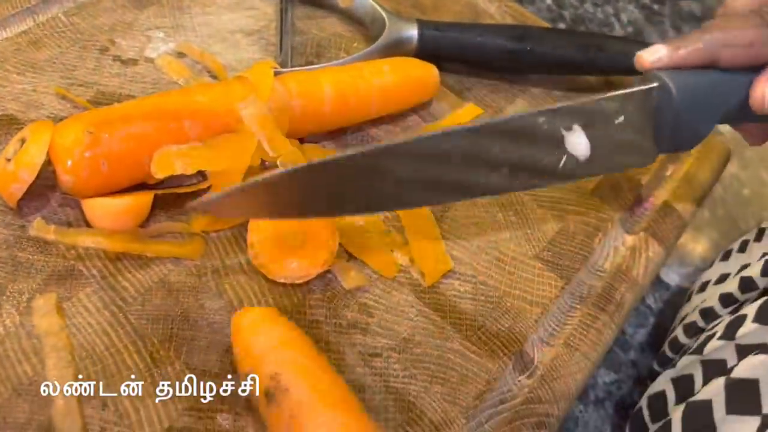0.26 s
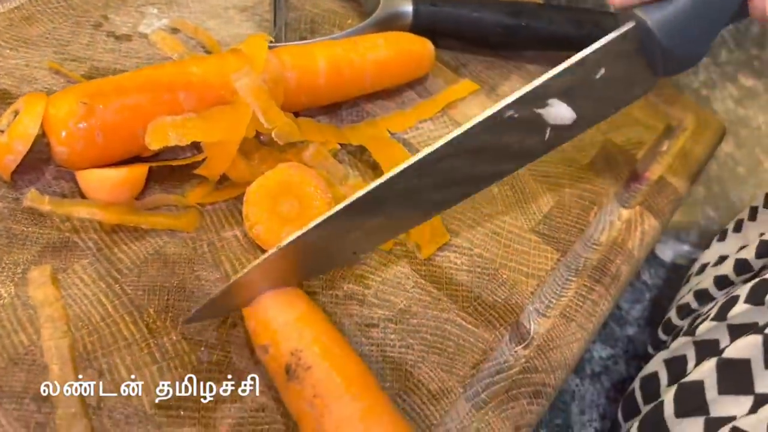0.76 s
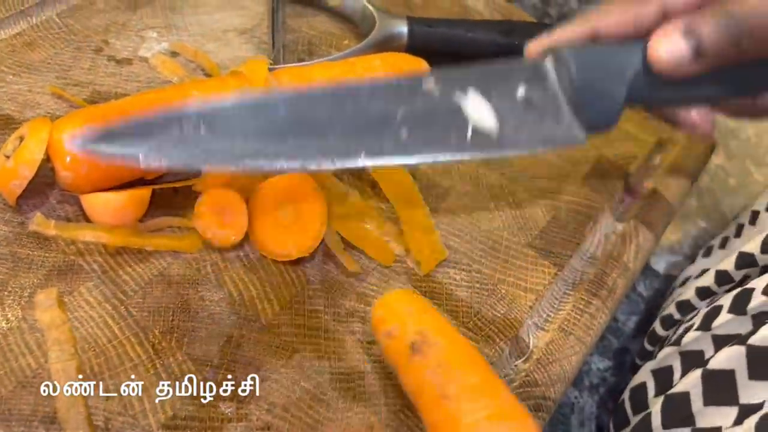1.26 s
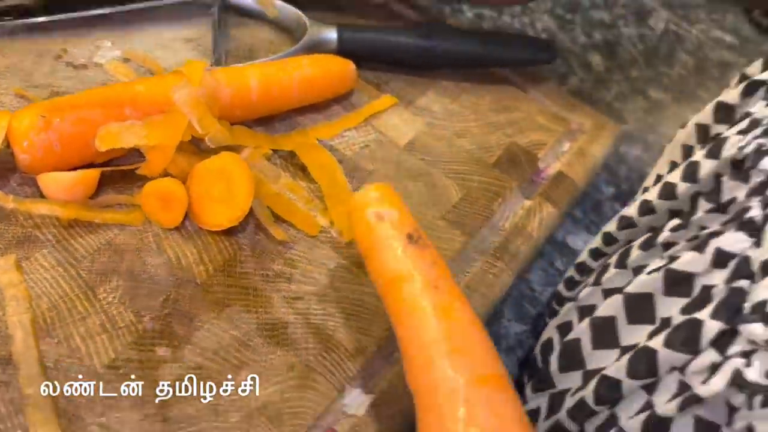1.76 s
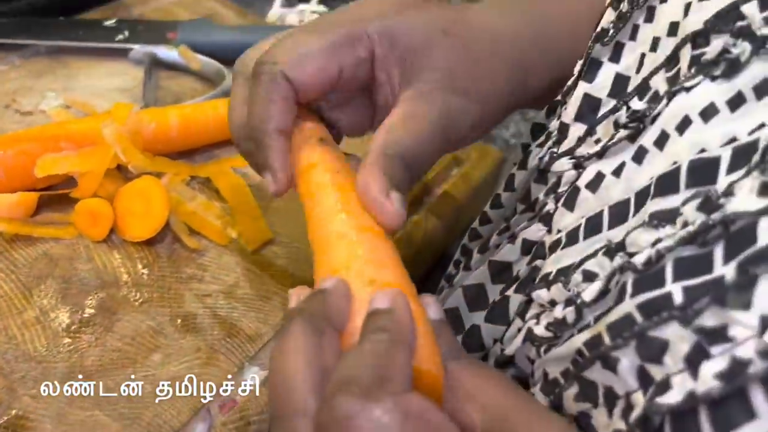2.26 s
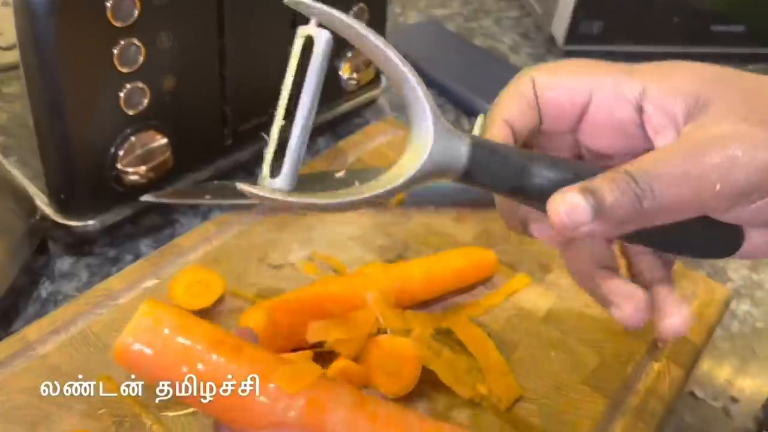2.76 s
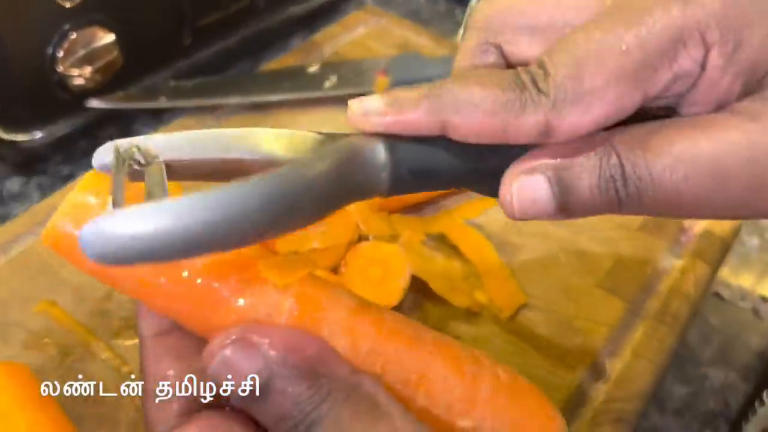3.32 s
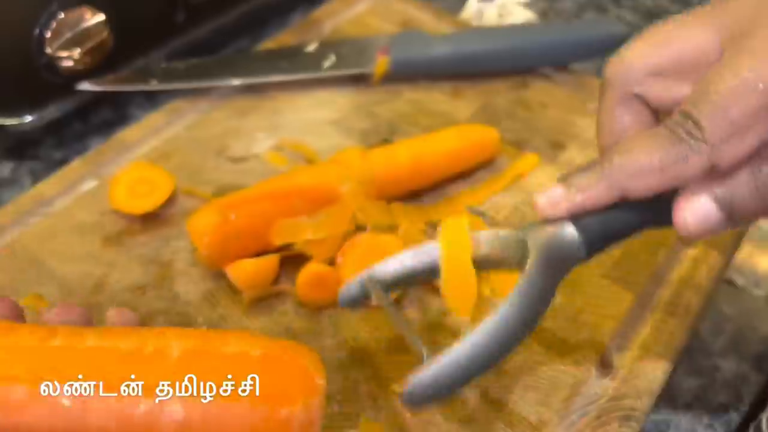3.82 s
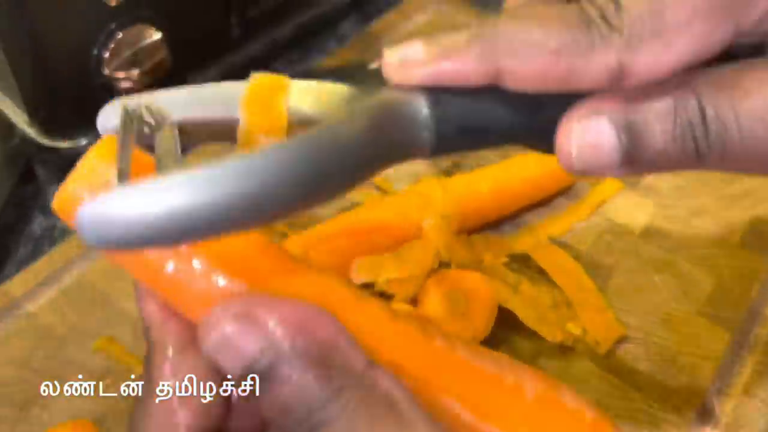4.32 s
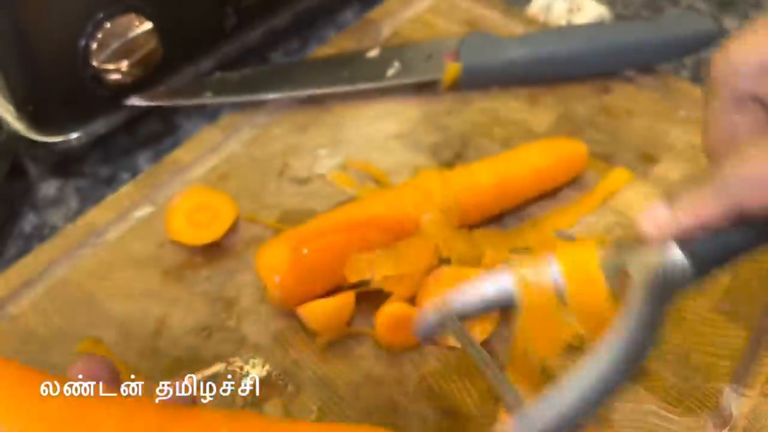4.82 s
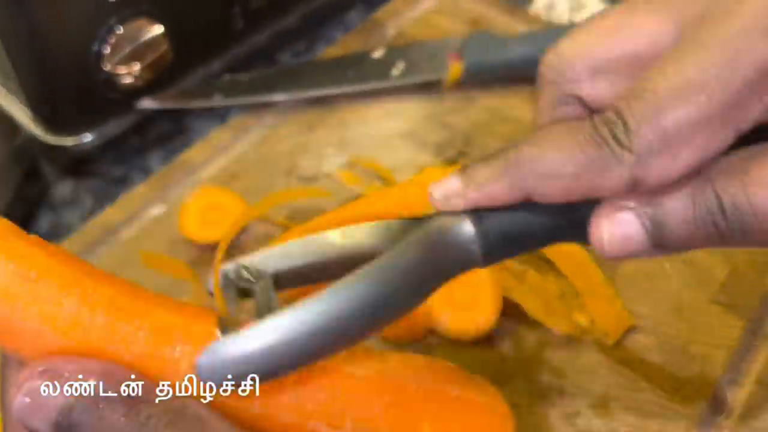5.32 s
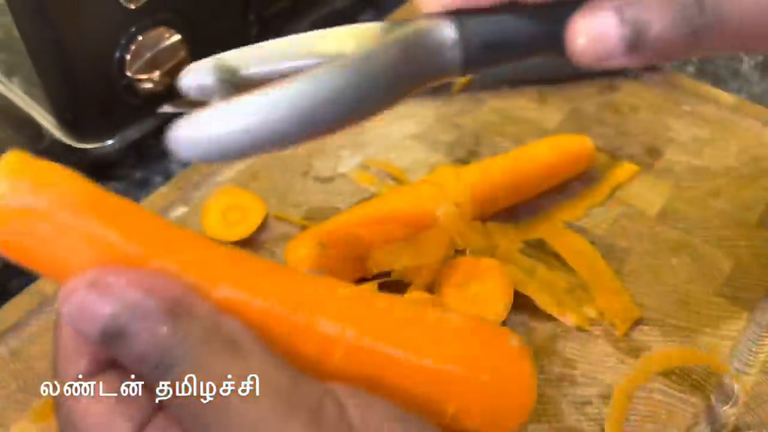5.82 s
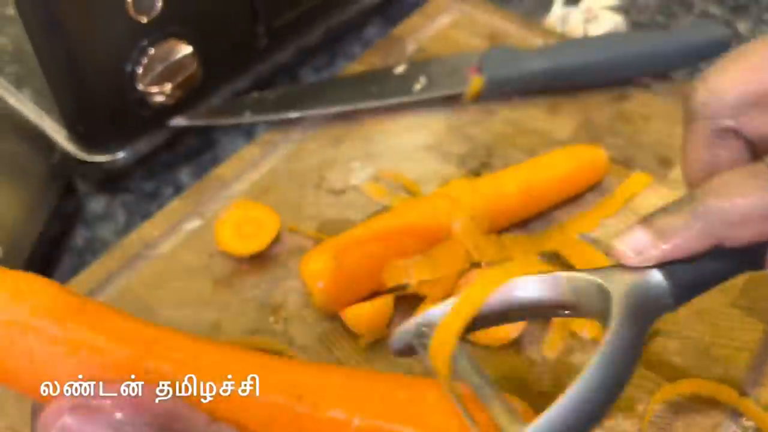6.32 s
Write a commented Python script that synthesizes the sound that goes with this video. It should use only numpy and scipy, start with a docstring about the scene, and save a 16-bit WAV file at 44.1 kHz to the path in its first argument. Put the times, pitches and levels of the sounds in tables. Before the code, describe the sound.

Soft handling thuds lead to a crunchy carrot cut, its squeak ending in a hard snap and board knock. Several sharp wooden blows follow as the knife is set down, some distorting. Then a small metal peeler chatters in the hand and pulls four half-second, bright, hissy scrapes along the carrot, clicking back after each. Dry, close sound, short room echoes and low hum.

```python
"""Carrot trimmed and peeled in a small kitchen

A knife cuts the end off a carrot on a wooden board and is laid down; then a swivel peeler rattles in
the hand and takes four long strips. Blows and clicks are rough contacts ringing modes; cutting and
peeling are dense random grains through fixed and gliding resonances. A soft hum and rustle lie beneath;
short noise echoes answer, and the hardest blows overload the close microphone."""
import sys
import numpy as np
from scipy import signal
from scipy.fft import rfft, irfft
from scipy.io import wavfile

SR = 44100
rng = np.random.default_rng(int(sys.argv[2]) if len(sys.argv) > 2 else 0)


def to_wav(s):
    """Save 16-bit WAV."""
    ch = np.atleast_2d(s).T  # columns
    pcm = np.round(np.clip(ch, -1, 1) * 32767)  # PCM
    wavfile.write(sys.argv[1], SR, pcm.astype(np.int16))


N = 290178

# blows on the board: (time [s], peak [dB], centre of colour [Hz], contact [ms], freedom to ring [0-1],
# peak of the thud passed to the worktop [dB])
KNOCKS = [(0.103, -10.5, 1580, 0.72, 0.05, -41), (0.956, 10, 1300, 8, 0.55, 1.5),
          (1.25, -13, 1170, 10.5, 0.65, -20), (1.703, 19.5, 1030, 3, 0.36, -11.5),
          (1.844, 13, 2410, 3.8, 0.36, -22), (1.897, -5, 2620, 1.6, 0.92, -29),
          (1.969, -2, 1520, 2.5, 0.5, -11.5), (2.024, 20, 870, 0.9, 0.15, -9),
          (2.046, 3, 795, 2.1, 0.36, -7), (2.129, -19, 850, 14, 0.26, -17),
          (3.289, -15.5, 1800, 0.27, 0.05, -24.5)]
# peeling strokes: (start [s], end [s], time to bite [s], level early, late [dB], lower note early, late [Hz],
# its strength early, late [dB], treble early, late [dB], upper note [Hz])
STROKES = [(3.392, 3.843, .12, -19, -15.5, 2740, 2870, -9.5, -6, -5, -4, 4880),
           (4.397, 4.83, 0.1, -16.5, -13, 2730, 2640, -4, -2, -9, -5, 4260),
           (5.203, 5.693, 0.062, -15.5, -16.5, 2380, 3160, -5, -11, -5.5, -6, 4100),
           (6.124, 6.526, 0.083, -14, -17, 2690, 3030, -3, -4.5, -6.5, -10, 4140)]
WIDE_SPREAD, NARROW_SPREAD = .012, .004     # relative pitch spread inside a cluster of modes


def from_db(db):
    """Gain of a level in dB."""
    return 10 ** (np.asarray(db) / 20)


def rms_one(x):
    """Scale to rms 1."""
    return x / np.sqrt(np.mean(x ** 2) + 1e-20)


def butterworth(x, order, hz, side):
    """Butterworth filter; side is low, high or band."""
    return signal.sosfilt(signal.butter(order, hz, side, fs=SR, output="sos"), x)


def in_time(rows):
    """Columns of a curve at every sample; -150 outside it, silence for a level."""
    s, *columns = np.transpose(rows)
    t = np.arange(N) / SR
    return [np.interp(t, s, column, left=-150, right=-150) for column in columns]


def swells(rows, edge_db):
    """Sum of swells (start, loudest, end, dB), straight in dB."""
    total = 0
    for start, top, end, db in rows:
        curve = [(start, db + edge_db), (top, db), (end, db + edge_db)]
        total = total + from_db(in_time(curve)[0])
    return total


def at_hz(points, hz):
    """Values of a curve read on a log-frequency axis."""
    point_hz, value = np.transpose(points)
    return np.interp(np.log(hz), np.log(point_hz), value)


def coloured(x, spectrum):
    """Noise or grains given a spectrum; rms 1."""
    hz = np.maximum(np.arange(N // 2 + 1) * SR / N, 1)
    return rms_one(irfft(rfft(x) * from_db(at_hz(spectrum, hz)), N))


def drift(rate_hz):
    """Slow chance with spread 1: two-pole noise computed every 40 samples."""
    step, settle = 40, 2000
    r = np.exp(-2 * np.pi * rate_hz * step / SR)
    noise = rng.standard_normal(N // step + settle + 2)
    slow = signal.lfilter([1], [1, -2 * r, r * r], noise)[settle:]
    return np.interp(np.arange(N) / step, np.arange(len(slow)), rms_one(slow))


def grains(per_s, spread_db):
    """Random clicks of uneven size."""
    size_db = spread_db * np.minimum(rng.exponential(1, N), 4)
    sizes = from_db(size_db) * rng.standard_normal(N)
    return sizes * (rng.random(N) < per_s / SR)


def resonate(x, hz, width_hz):
    """Fixed two-pole resonance with unit gain near its peak."""
    r = np.exp(-np.pi * width_hz / SR)
    a = [1, -2 * r * np.cos(2 * np.pi * hz / SR), r * r]
    return signal.lfilter([(1 - r * r) / 2, 0, (r * r - 1) / 2], a, x)


def gliding(x, hz, width_hz):
    """A steep resonance whose centre moves: the slow part of the grains rides on a gliding carrier."""
    carrier = np.exp(2j * np.pi * np.cumsum(hz) / SR)
    r = np.exp(-np.pi * width_hz / SR)
    slow = signal.lfilter([1], [1, -2 * r, r * r], x / carrier)
    return rms_one(np.real(slow * carrier))


def strike(events, modes, falloff_db, spread, dense_db, dense_t60, tick_db, size):
    """Rough contacts ring the modes nearest their colour, as clusters of partials over dense lesser modes.

    Falloff is per octave, size in samples; freedom scales all decay times."""
    out, t = np.zeros(N + SR), np.arange(size) / SR
    hz, level_db, t60 = np.repeat(np.transpose(modes), 3, axis=1)[:, :, None]    # three partials a mode
    bins_hz = np.maximum(np.arange(size // 2 + 1) * SR / size, 20)
    for s, peak_db, centre_hz, ms, *freedom in events:
        detune = spread * rng.standard_normal((len(hz), 1))
        uneven_db = 2 * rng.standard_normal(len(hz))
        age = t / np.prod(freedom)      # a held body dies sooner

        turns = (hz * (1 + detune) * t).astype(np.float32)
        decay = np.exp((-np.log(1000) * age / t60).astype(np.float32))
        off_colour_db = falloff_db * np.abs(np.log2(hz[:, 0] / centre_hz))
        body = from_db(level_db[:, 0] - off_colour_db + uneven_db) @ (np.sin(2 * np.pi * turns) * decay)

        off_colour_db = falloff_db * np.abs(np.log2(bins_hz / centre_hz))
        dense = irfft(rfft(rng.standard_normal(size)) * from_db(-off_colour_db), size)
        dense = from_db(dense_db - 60 * age / dense_t60) * rms_one(dense)
        body = body / np.abs(body).max() + dense

        rough = rng.standard_normal(size)
        rough[0] = from_db(tick_db)     # the first touch is the sharpest
        hold = np.exp(-(t * 1000 / max(ms, .2)) ** 4)    # chatters evenly, then lets go
        contact = (rough * hold)[:round(ms * SR / 500) + 20]
        sound = signal.fftconvolve(contact, body)[:size]
        at = round(s * SR)
        out[at:at + size] += from_db(peak_db) * sound / np.abs(sound).max()
    return out[:N]


def background():
    """Hands and cloth rustle as coloured grains over a steady hum of coloured noise."""
    # hum spectrum: (frequency [Hz], density [dB per Hz])
    hum = [(12, -49), (20, -3), (48, -2.5), (135, -1), (634, -16), (772, -15), (1210, -20), (4280, -29.5),
           (14700, -37), (16500, -53.5)]
    # cloth spectrum: (frequency [Hz], density [dB per Hz])
    cloth = [(240, -19), (400, -6), (481, -11), (994, -5), (1270, -13), (1490, -7.5), (2630, -12),
             (4380, -12), (16000, -31)]
    # larger moves of hands and sleeves: (start [s], loudest [s], end [s], level [dB])
    moves = [(.18, .35, 0.79, -37), (.7, 1.15, 2, -38), (2.15, 2.35, 2.5, -52)]
    hum_db, still_db, reach_db = -41, -51, -42
    reach_s, lead_s = .42, .13     # the hand reaches back before every stroke
    reaches = [(s - reach_s, s - lead_s, s + lead_s, reach_db) for s, *_ in STROKES]
    level = from_db(still_db) + swells(moves + reaches, edge_db=-11.5)
    flutter = from_db(1.0 * drift(49))
    rustle = coloured(grains(8000, spread_db=1.0), cloth) * level * flutter
    return rustle + from_db(hum_db) * coloured(rng.standard_normal(N), hum)


def knife_snaps():
    """The knife snaps through fibres and ticks, ringing a blade damped by the carrot."""
    # snaps and ticks: (time [s], peak [dB], centre of colour [Hz], contact [ms])
    snaps = [(0.011, -25.5, 2720, 1.8), (0.553, -21, 4440, 5.3), (0.739, -22.5, 2760, 1.4),
             (0.768, -13, 2760, 1.2), (0.883, -11, 5600, 3.6), (0.923, -7, 5000, 1.64),
             (0.938, 2.5, 4200, 9.8), (0.949, 19, 2850, 6), (1.073, -15.5, 8500, 2.4),
             (1.098, -17, 5000, 1.85), (1.115, -7.5, 11000, 1.8), (1.145, -9.5, 8040, 2.2),
             (1.236, -9, 3500, 15)]
    # blade modes: (frequency [Hz], level [dB], t60 when free [s])
    blade_modes = [(2650, -3, .08), (2870, 0, .2), (3300, -8, .05), (4300, -12, .025), (5050, -6, .12),
                   (6400, -11, .025), (7300, -10, .02), (8500, -10, .025), (10900, -10, .025),
                   (11500, -11, .025)]
    freedom = 0.33
    return strike([(*row, freedom) for row in snaps], blade_modes, falloff_db=9.0, spread=WIDE_SPREAD,
                  dense_db=-7.5, dense_t60=0.083, tick_db=13, size=6000)


def board_knocks():
    """Blows ring the wooden board, more or less free each time."""
    # board modes: (frequency [Hz], level [dB], t60 when free [s])
    board_modes = [(262, -1, .28), (405, -5, .22), (484, 4, .26), (705, -1, .27), (762, 0, .3),
                   (872, 0, .33), (1014, -6, .2), (1290, -3, .2), (1438, -3, .18), (1555, -2, .22),
                   (1629, -5, .25), (2050, -5, .2), (2320, -2, .22), (3300, -9, .12), (4050, -10, .12),
                   (6640, -13, .1), (8490, -12, .16)]
    return strike([row[:-1] for row in KNOCKS], board_modes, falloff_db=8.5, spread=WIDE_SPREAD,
                  dense_db=-12.5, dense_t60=0.31, tick_db=24.5, size=12000)


def worktop_thuds():
    """The worktop rings low under soft thuds, rocking and the board's blows."""
    # soft thuds and rocking: (time [s], peak [dB], centre of colour [Hz], contact [ms])
    thuds = [(0.229, -7.5, 120, 5), (0.367, -22.5, 178, 7.5), (0.562, -19, 145, 7.6),
             (1.379, -16.5, 149.4, 20.4), (1.43, -21, 186, 48), (2.13, -10, 265, 39),
             (4.518, -24.5, 82, 8.2), (4.883, -24, 230, 37), (5.95, -35, 300, 11)]
    # worktop modes: (frequency [Hz], level [dB], t60 when free [s])
    worktop_modes = [(77, -9, 0.5), (117, -2, 0.25), (185.3, -1.5, 0.16), (263.2, -4.5, 0.34),
                     (303, -18.5, 0.72), (379.6, -25.5, 0.45)]
    passed_hz, passed_ms, passed_freedom = 220, 13.7, 0.54
    passed = [(s, db, passed_hz, passed_ms, passed_freedom) for s, *_, db in KNOCKS]
    free = [(*row, 1) for row in thuds]
    return strike(free + passed, worktop_modes, falloff_db=12.5, spread=WIDE_SPREAD,
                  dense_db=-7.5, dense_t60=0.17, tick_db=15, size=14000)


def cutting():
    """Grains crackle under the knife; its squeak swells and rises in pitch up to the snap, then dies."""
    # runs of crackle, fibres cracking, then the knife sliding off and wiping:
    # (start [s], loudest [s], end [s], level [dB]); the last breaks off just short of its loudest
    crackles = [(.74, .93, .94, -20), (.91, .955, 0.97, -13), (1.05, 1.11, 1.25, -24.5),
                (1.215, 1.243, 1.24, -20)]
    # crackle spectrum: (frequency [Hz], density [dB per Hz])
    crunch = [(880, -7.5), (1500, -7), (2740, -22), (3520, -4), (9280, -13.5), (11100, -13), (16000, -33.5)]
    bite_s, snap_s = .768, 0.94
    rise_s = .05     # the squeak's pitch rises just before the snap
    pressed_db, snap_db = -33.5, -8.5
    load_db_per_s, free_db_per_s = 700, 223     # last swell before the snap, decay after it
    pressed_hz, free_hz = 2680, 2930
    late_s = np.arange(N) / SR - snap_s
    pressed = from_db(pressed_db) * (late_s > bite_s - snap_s) * (late_s < 0)
    slope_db_per_s = np.where(late_s < 0, load_db_per_s, -free_db_per_s)
    squeak = pressed + from_db(snap_db + slope_db_per_s * late_s)
    squeak_hz = np.interp(late_s, [-rise_s, 0], [pressed_hz, free_hz])
    crackle = grains(6000, spread_db=4.0)
    runs = swells(crackles, edge_db=-34) * coloured(crackle, crunch)
    return squeak * gliding(crackle, squeak_hz, 260) + runs


def peeler_rattles():
    """The loose blade clicks in its frame, swings over with a chatter, seats, and flips back after strokes."""
    # single clicks: (time [s], peak before the high-pass [dB], centre of colour [Hz], chatter [ms])
    clicks = [(2.71, -5, 4860, 7), (2.787, -20.5, 3960, 8.2), (2.838, -9, 4460, 6.3),
              (2.868, -13.5, 6200, 8.8), (2.94, -20.5, 4860, 17), (2.957, -18.5, 5540, 14),
              (3.048, -14.5, 5700, 4), (3.085, -22, 3000, 3), (4.035, 3, 4670, 2.6),
              (4.298, -13.5, 4500, 5), (4.748, 4.5, 4080, 2.1), (4.853, -7, 6030, 0.79),
              (4.9, -10, 3050, 0.8), (4.962, 2, 4500, 2.1), (4.977, -9, 8500, 1.1), (5.05, -22, 7700, 0.9),
              (6.117, -10, 4200, 13)]
    # swings: (time [s], chatter peak before the high-pass [dB], time until it seats [ms], seating peak, same [dB])
    swings = [(2.555, -6, 10.6, 1), (2.685, -8.5, 19.5, 1.5), (3.151, -5.5, 21.4, -2.5),
              (4.259, -7, 15.8, 6), (5.115, 12.5, 20, 11), (6.002, 6.5, 17.7, -7)]
    # peeler modes: (frequency [Hz], level [dB], t60 [s])
    peeler_modes = [(1990, 5, .07), (2820, -4, .02), (3200, -6, .02), (4060, -5, .02), (4450, 0, .04),
                    (4700, -2, .025), (5110, -1, .03), (5670, -4, .025), (6270, -5, .025), (7690, -2, .025),
                    (8150, -4, .025), (9290, -1, .06), (10850, 1, .07), (11810, 12, .08), (13300, -1, .06)]
    chatter_hz, chatter_hz_per_db, chatter_share = 5600, -40, .65    # harder swings chatter lower
    seat_hz, seat_ms = 4700, 3.44
    leave_s, leave_db, leave_hz, leave_ms = .006, 1, 5570, 3.9
    chatter = [(s, db, chatter_hz + chatter_hz_per_db * db, chatter_share * ms) for s, db, ms, _ in swings]
    seat = [(s + ms / 1000, db, seat_hz, seat_ms) for s, _, ms, db in swings]
    leave = [(end + leave_s, leave_db, leave_hz, leave_ms) for _, end, *_ in STROKES]
    rattle = strike(clicks + chatter + seat + leave, peeler_modes, falloff_db=19.0, spread=NARROW_SPREAD,
                    dense_db=-3, dense_t60=0.0071, tick_db=20.0, size=5000)
    return butterworth(rattle, 4, 1700, "high")    # the tiny blade has no body


def stroke(start, end, bite, early_db, late_db, early_hz, late_hz,
           sung_db, sung_late_db, bright_db, bright_late_db, upper_hz):
    """Touch, bite, pull, run out, lift: (s, level dB, lower Hz, lower dB, upper Hz, top Hz, treble dB)."""
    touch_s, touch_db, touch_hz, touch_dull_db = 0.02, -6.5, 3350, -5     # light, dull first touch
    run_out_s, shift_s = 0.061, .012     # as it runs out the upper note shifts over
    lift_s, lift_db, lift_hz = 0.018, -23, 5000
    top_hz = 2.05 * upper_hz
    sagged_hz = top_hz * (1 - .1)     # the top note sags along the stroke
    run_out = end - run_out_s
    touch = touch_hz, sung_db, upper_hz, top_hz, bright_db + touch_dull_db
    lift = late_hz, sung_late_db, lift_hz, sagged_hz, bright_late_db
    return [(start, early_db + 3 * touch_db, *touch),
            (start + touch_s, early_db + touch_db, *touch),
            (start + bite, early_db, early_hz, sung_db, upper_hz, top_hz, bright_db),
            (run_out, late_db, late_hz, sung_late_db, upper_hz, sagged_hz, bright_late_db),
            (run_out + shift_s, late_db, *lift),
            (end - lift_s, late_db - 1.5, *lift),
            (end, late_db + lift_db, *lift)]


def peeling():
    """Cells burst along the blade; the pull wavers, and each resonance sings more or less in turn."""
    # spectrum of the bursting cells: (frequency [Hz], density [dB per Hz])
    peel = [(88, -52.5), (150, -58), (244, -10), (431, -17.5), (759, -17), (888, -14.5), (1500, -17),
            (1980, -7), (2760, 5), (3420, -9), (3920, 1), (6510, -4.5), (8070, -6), (11700, -14),
            (16000, -71)]
    # steady resonances of the frame under the cut: (frequency [Hz], width [Hz], level [dB])
    singing = [(770, 74, -11), (3232, 140, 11), (3672, 160, 4), (4930, 170, 2.5), (5600, 810, -6),
               (7530, 287, -7), (9100, 120, -33)]
    wander, wander_hz = 0.045, 9     # share by which the singing strays, and how fast
    curves = np.max([in_time(stroke(*row)) for row in STROKES], axis=0)
    level_db, low_hz, low_db, high_hz, top_hz, treble_db = curves
    bursts = grains(20000, spread_db=1.0) * from_db(1.0 * drift(90))

    frame = 0
    for hz, width_hz, db in singing:
        frame = frame + from_db(db + 3.1 * drift(6.9)) * resonate(bursts, hz, width_hz)
    low = gliding(bursts, low_hz * (1 + wander * drift(wander_hz)), 380)
    high = gliding(bursts, high_hz * (1 + wander * drift(wander_hz)), 650)
    low = from_db(low_db + 1.9 * drift(8)) * low
    high = from_db(-4.0 + 1.9 * drift(8)) * high
    top = from_db(-12) * gliding(bursts, top_hz, 1640)     # broad note over the upper one
    sound = coloured(bursts, peel) + from_db(-1.5) * rms_one(frame) + low + high + top

    body = rms_one(butterworth(sound, 3, 6500, "low"))
    treble = rms_one(butterworth(sound, 3, 6500, "high"))
    return from_db(level_db) * (body + from_db(treble_db) * treble)


def kitchen(x):
    """Dense echoes: octave bands of noise, each dying at its own rate."""
    # decay of the room: (frequency [Hz], t60 [s])
    room_t60 = [(100, 0.42), (1000, 0.31), (5000, 0.33), (15000, 0.24)]
    t, tail = np.arange(SR // 2) / SR, 0
    for hz in 90 * 2. ** np.arange(8):
        noise = rng.standard_normal(len(t))
        band = butterworth(noise, 2, [hz / np.sqrt(2), hz * np.sqrt(2)], "band")
        tail = tail + band * from_db(-60 * t / at_hz(room_t60, hz))
    tail = tail * np.minimum(t / 0.0015, 1)
    return signal.fftconvolve(x, tail / np.sqrt(np.sum(tail ** 2)))[:N]


def scene():
    """Everything lies in front of one microphone: both channels are alike."""
    kitchen_db, rattle_send_db = -12, -1.5     # the peeler is held near, so the room answers it less
    hum_and_rustle = background()
    near = knife_snaps() + board_knocks() + worktop_thuds() + cutting() + peeling()
    near = butterworth(near, 4, 68, "high")    # small things radiate no deep bass
    rattle = peeler_rattles()
    echoes = from_db(kitchen_db) * kitchen(near + from_db(rattle_send_db) * rattle)
    return np.tile(near + rattle + echoes + hum_and_rustle, (2, 1))


def record(dry):
    """The hardest blows clip flat about a slight offset; a steep low-pass cuts the top."""
    offset, stopband_hz = -.008, 16400
    clipped = np.clip(dry + offset, -1, 1)
    return signal.sosfilt(signal.cheby2(12, 60, stopband_hz, fs=SR, output="sos"), clipped)


dry = scene()
out = record(dry)
to_wav(out)
```